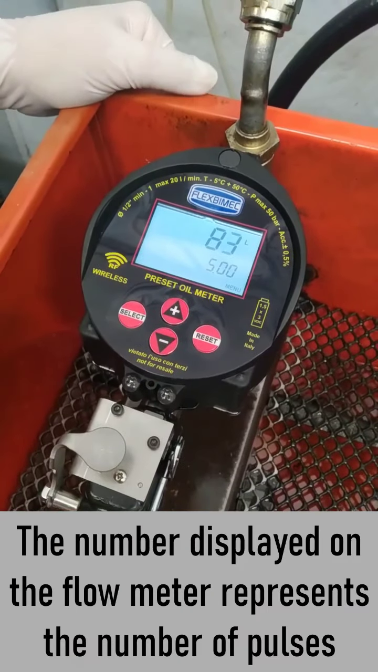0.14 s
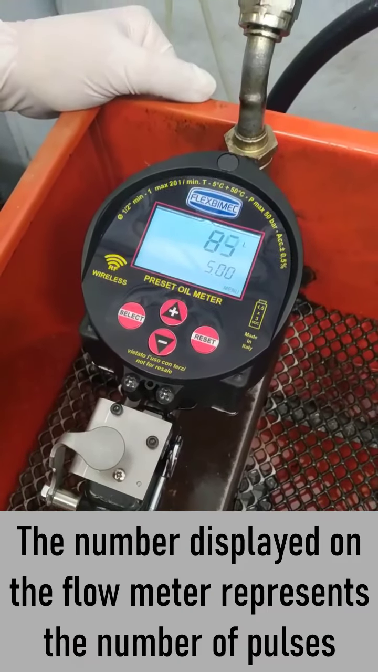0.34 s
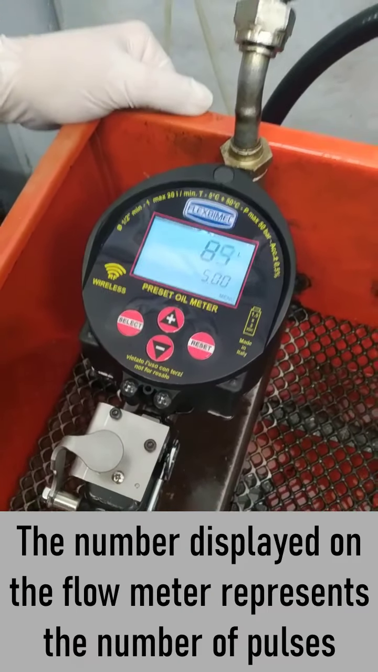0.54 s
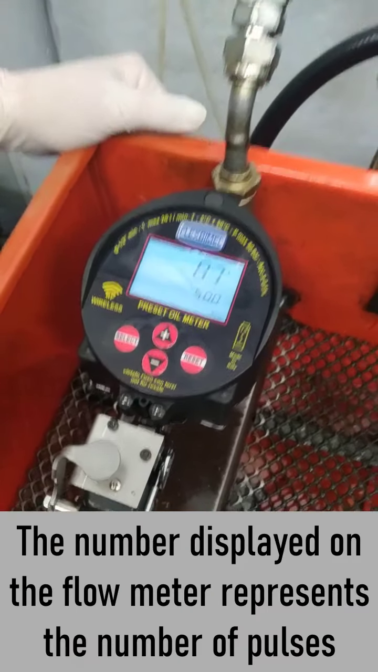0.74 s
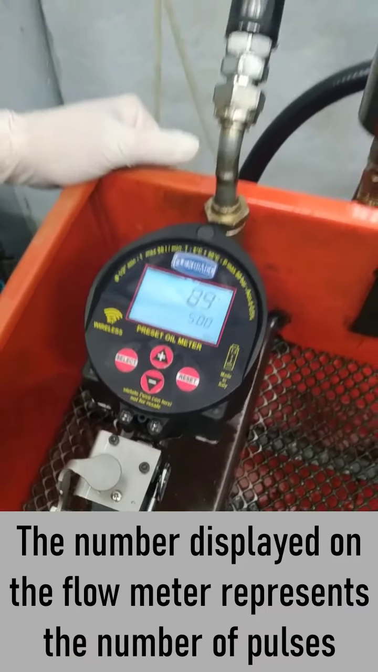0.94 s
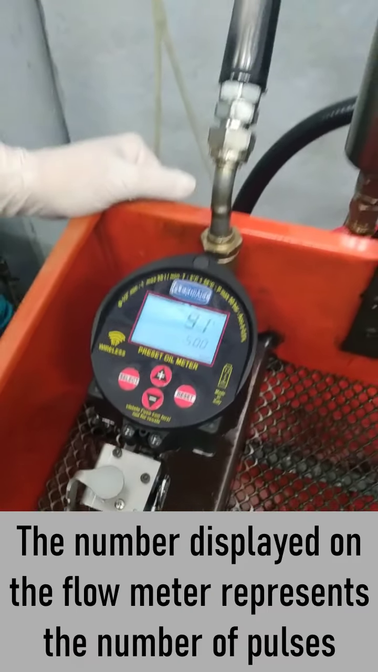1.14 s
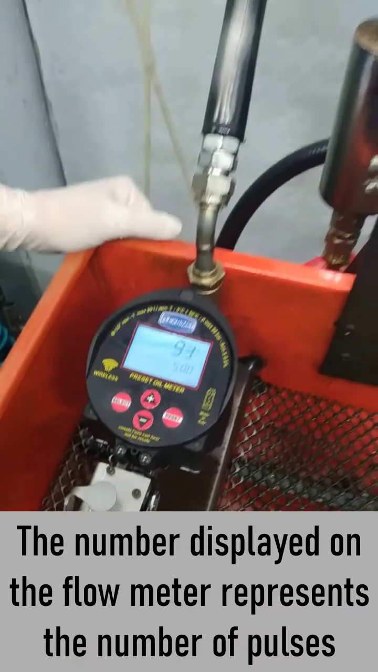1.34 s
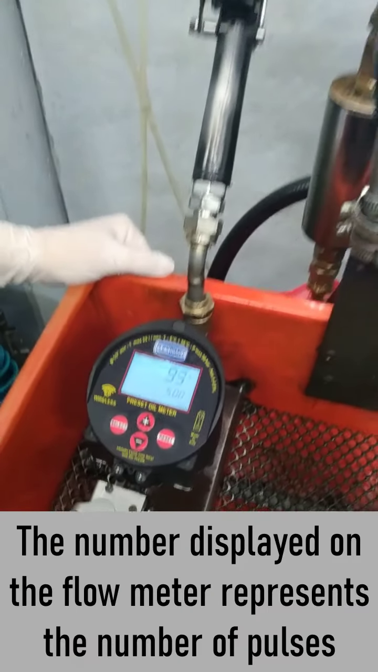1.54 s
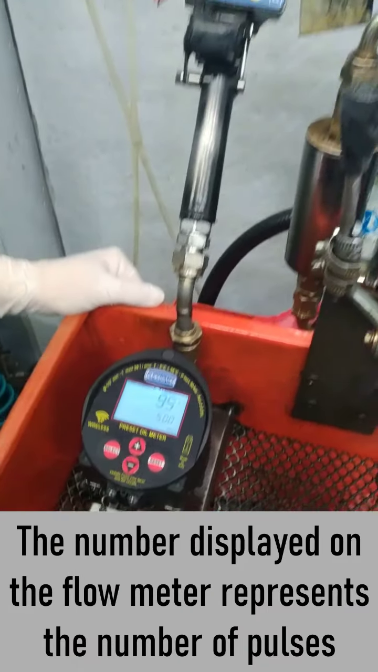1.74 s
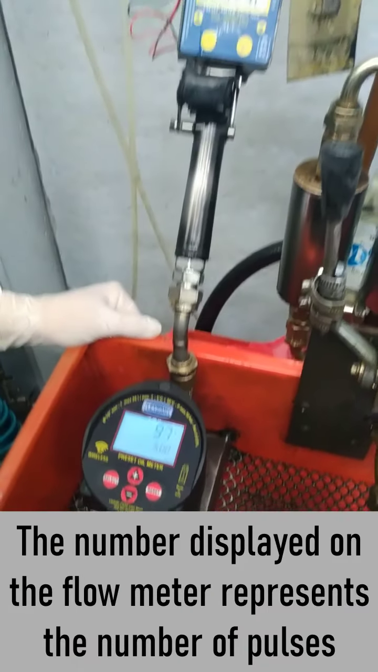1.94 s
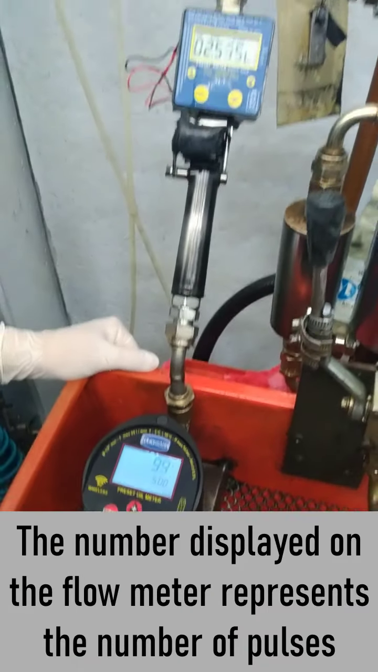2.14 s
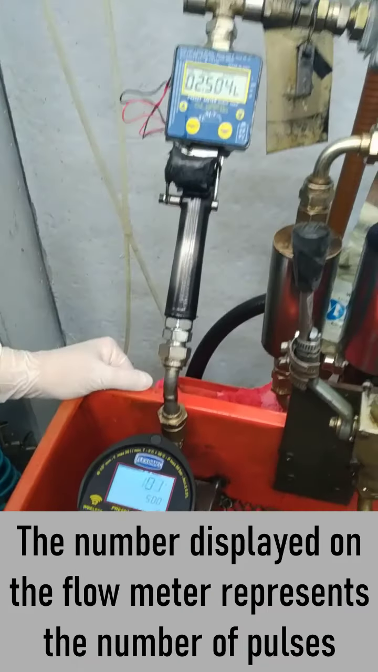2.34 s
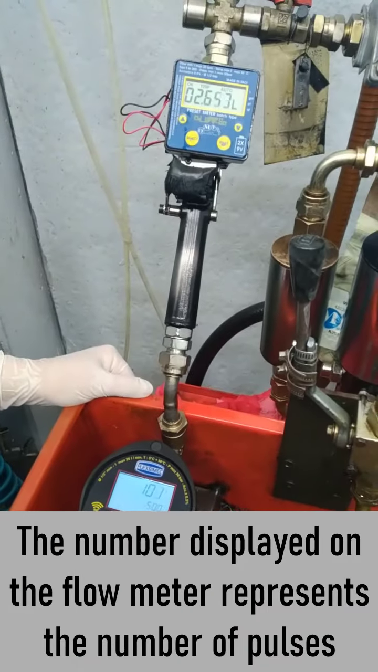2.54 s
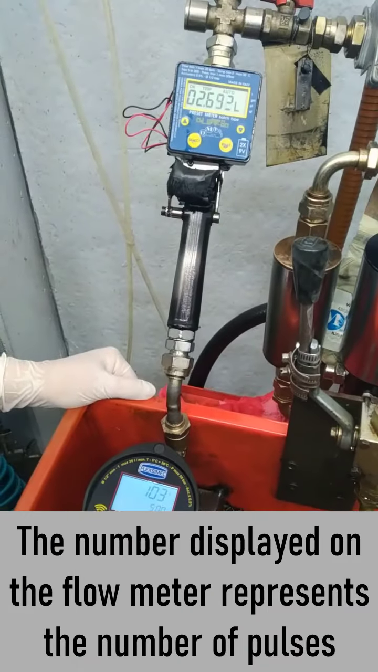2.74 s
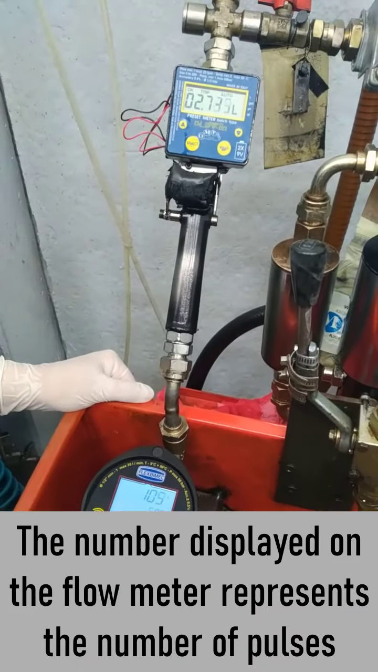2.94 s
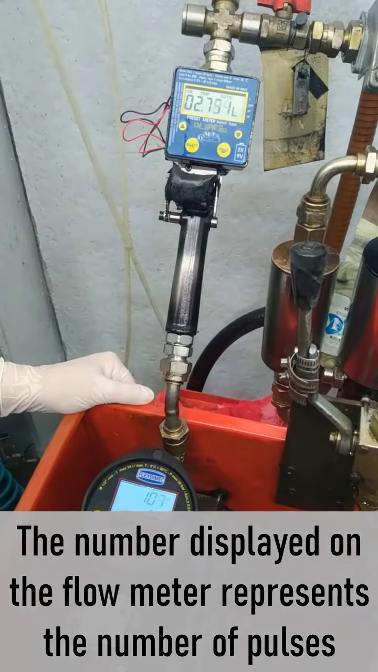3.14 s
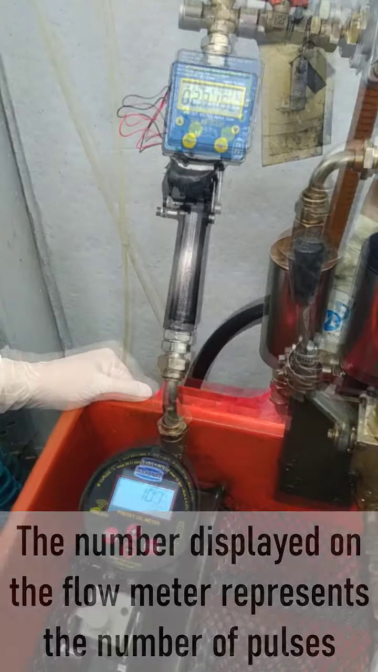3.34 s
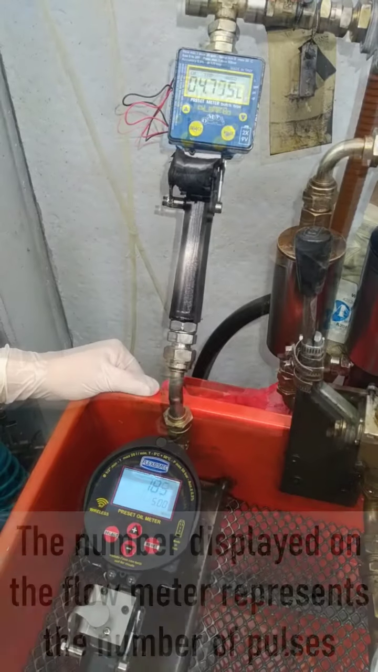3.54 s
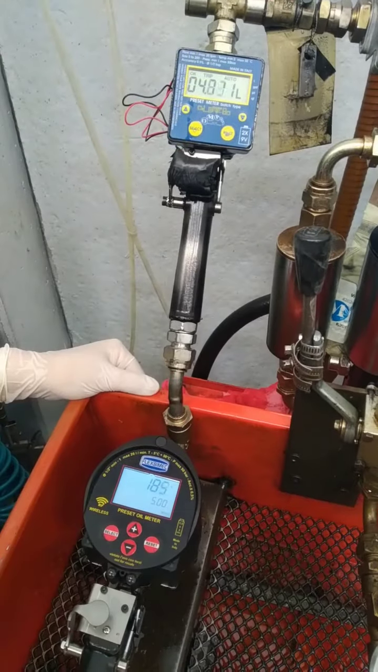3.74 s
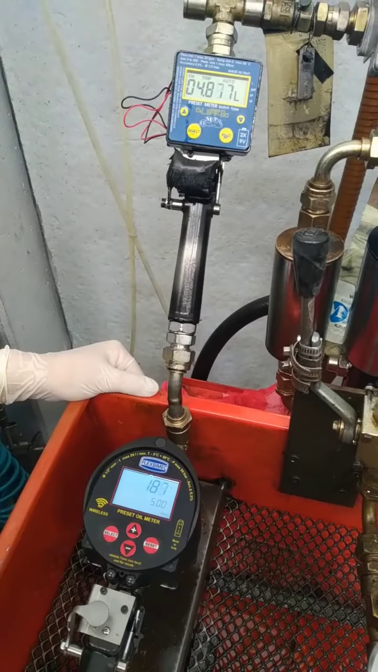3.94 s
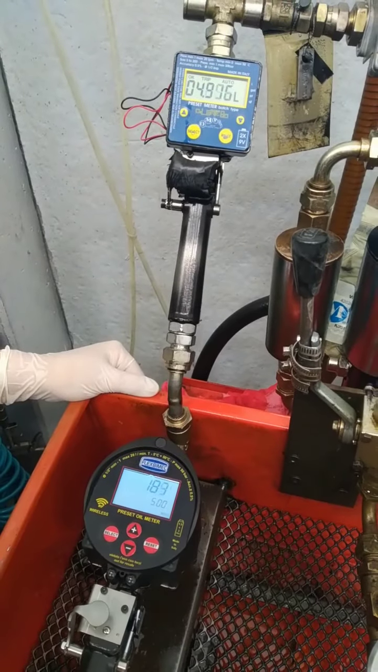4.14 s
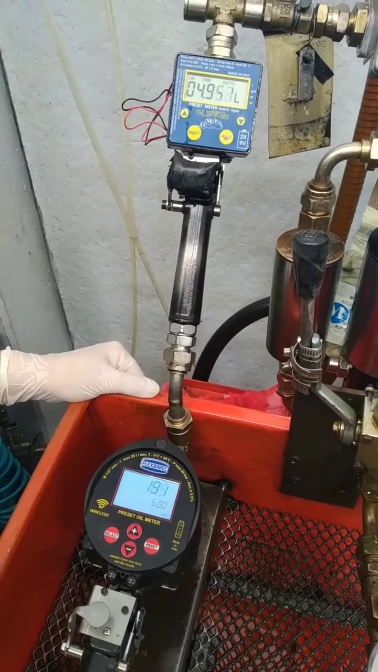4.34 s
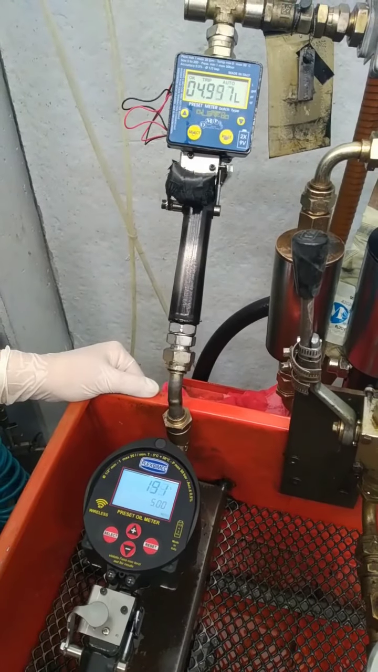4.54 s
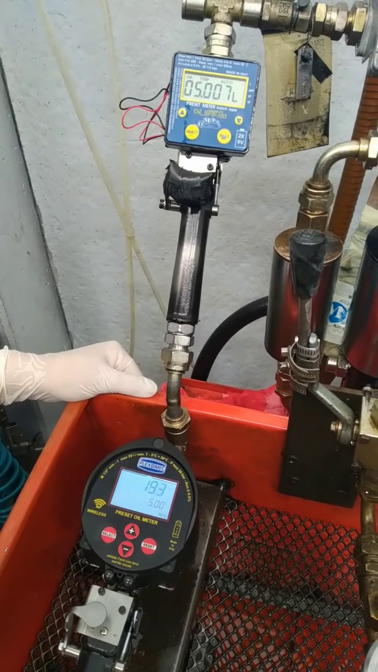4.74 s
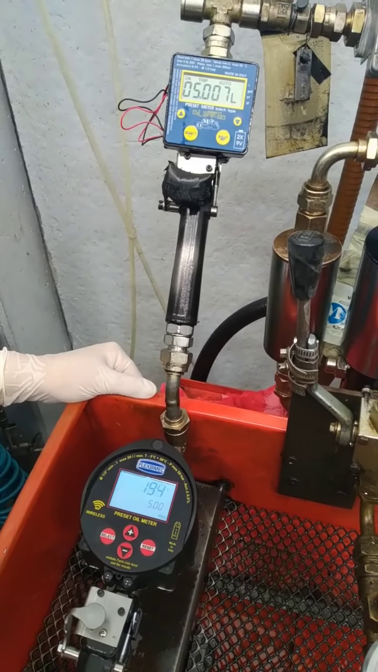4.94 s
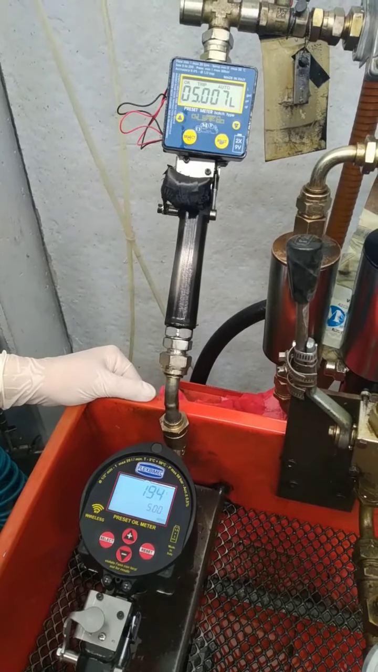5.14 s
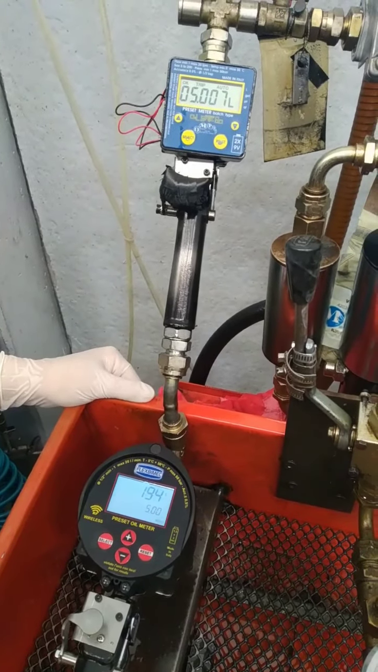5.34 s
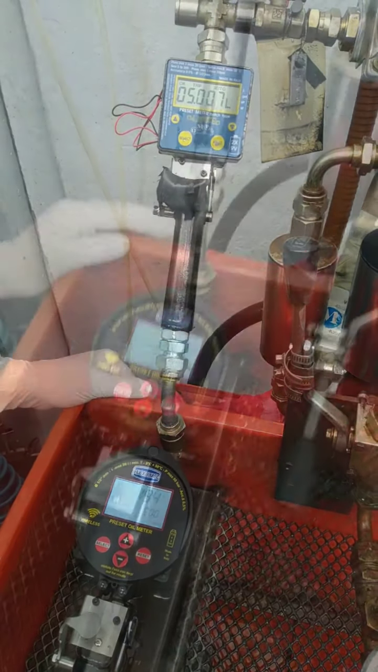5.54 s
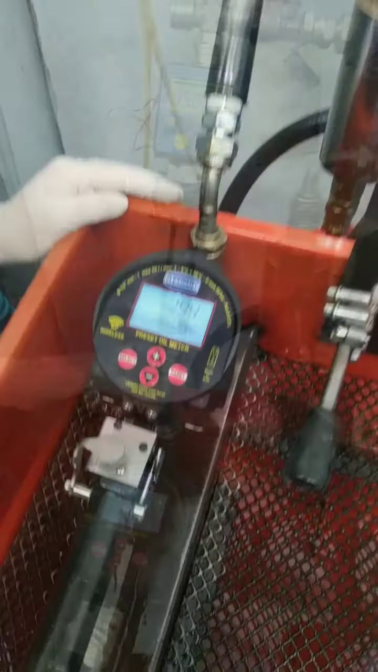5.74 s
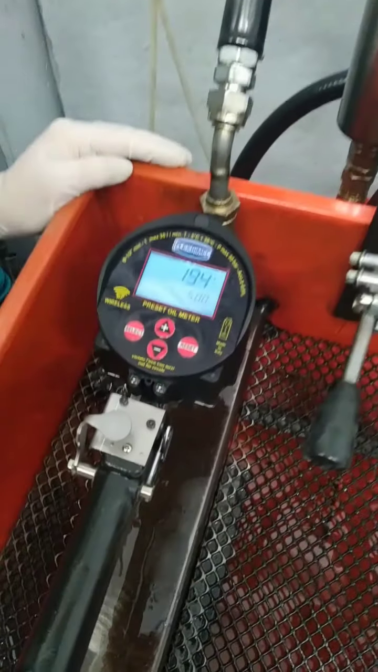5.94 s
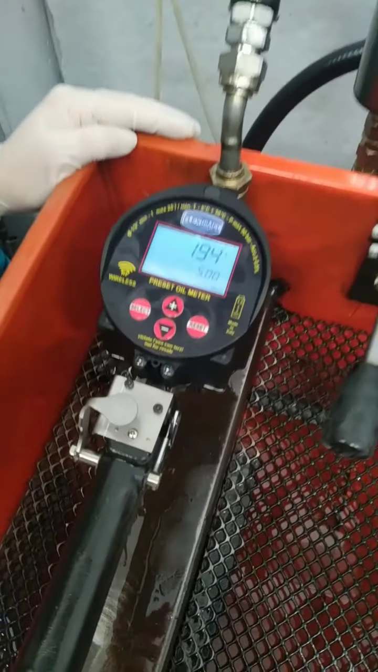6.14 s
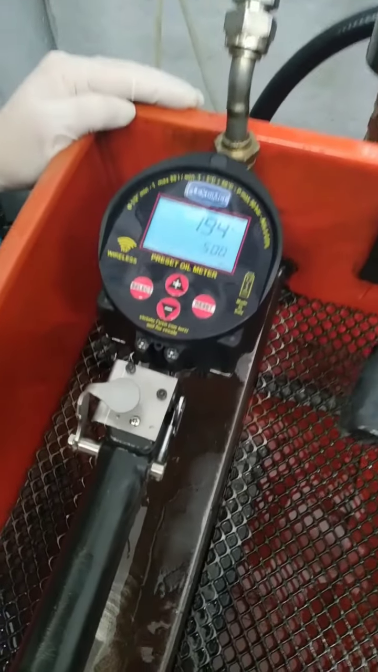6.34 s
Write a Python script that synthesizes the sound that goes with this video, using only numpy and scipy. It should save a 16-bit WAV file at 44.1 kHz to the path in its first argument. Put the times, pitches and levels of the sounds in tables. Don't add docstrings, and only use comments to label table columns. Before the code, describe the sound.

A small air-driven pump snaps rapidly and evenly over pulsing hiss and oil rush, then stalls with a hard clack and fades to faint scuffs.

```python
import sys
import numpy as np
from scipy import signal
from scipy.fft import rfft, irfft, next_fast_len
from scipy.io import wavfile
from scipy.ndimage import uniform_filter1d, minimum_filter1d, map_coordinates

SR = 44100
rng = np.random.default_rng(int(sys.argv[2]) if len(sys.argv) > 2 else 0)


def volts(x):
    e = np.asarray(x, float) / 20
    return 10 ** e


def to_wav(sig):
    pcm = np.clip(np.atleast_2d(sig), -1, 1) * 32767
    pcm = np.round(pcm).astype(np.int16)
    wavfile.write(sys.argv[1], SR, pcm.T)


N = 285751
T_S = np.arange(N) / SR


def unit(x):
    return x / np.sqrt(np.mean(x ** 2) + 1e-20)


def along(points, hz):
    f, v = np.transpose(points)
    return np.interp(np.log(hz + 1), np.log(f + 1), v)


def filtered(x, response):
    m = next_fast_len(N + SR // 2)
    return irfft(rfft(x, m) * response(np.fft.rfftfreq(m, 1 / SR)), m)[..., :N]


def colour(points):
    closed = (points[0][0] / 3, -60)
    return lambda hz: volts(along([closed] + list(points), hz))


def modes(rows):
    def one(f, centre, width, db):
        return volts(db) * 1j * f * width / (centre * centre - f * f + 1j * f * width)
    return lambda f: sum((-1) ** k * one(f, *row) for k, row in enumerate(rows))


def wander(step_count, rate_hz):
    return map_coordinates(rng.standard_normal(step_count), [T_S * rate_hz])


def noise(response, grain_db=0, rate_hz=300):
    flutter = wander(int(N * rate_hz / SR) + 4, rate_hz)
    return unit(filtered(volts(grain_db * flutter) * rng.standard_normal((2, N)), response))


def swell_db(t, rise_s, hold_s, t60_s):
    return np.where(t < 0, 9 * t / rise_s, -60 * (t - hold_s).clip(0) / t60_s)


def burst(at_s, db, rise_s, t60_s, hold_s=0):
    return volts(db + swell_db(T_S - at_s, rise_s, hold_s, t60_s).clip(-150))


def blows(times_s, dbs, late_s=.0006):
    x = np.zeros((2, N))
    x[0, (times_s * SR).astype(int)] = volts(dbs)
    x[1, ((times_s + late_s) * SR).astype(int)] = volts(dbs)
    return filtered(x, lambda hz: 1 / (1 + (hz / 9500) ** 6))


# (centre [Hz], width [Hz], level [dB])
VALVE_MODES = [(2610, 220, -12.5), (4000, 78, -17), (5310, 450, 0), (6030, 220, -16.5), (6780, 110, 2.5),
               (7140, 39, -6.5), (7300, 150, -19)]


def steel(points, ring):
    return lambda hz: colour(points)(hz) * (1 + ring * modes(VALVE_MODES)(hz))


def double_mode(hz, width_hz):
    return lambda f: modes([(hz, width_hz, 0)])(f) ** 2


# (time [s], peak level [dB], exhaust level [dB])
TOP_SNAPS = [(0.127, -9, -2), (0.5115, -7.5, -1.5), (0.8968, -7, -1.5), (1.282, -4.5, -2.5),
             (1.6666, -6.5, -1), (2.0517, -7.5, 0), (2.4343, -5, -1.5), (2.82, -5.5, -1.5),
             (3.2041, -5.5, -2), (3.5349, -10, -3), (3.919, -6, -2), (4.304, -5.5, -1.5)]
# (frequency [Hz], density [dB per Hz])
TOP_COLOUR = [(1000, -14.5), (2000, -8.5), (2800, -5), (3600, -4.5), (4300, 0), (5300, -2), (6100, -3.6),
              (6800, -0.5), (7600, -2), (8500, -12.5), (9600, -12.5), (11500, -16), (13000, -34),
              (15500, -33)]


def top_snaps():
    at_s, db, _ = np.transpose(TOP_SNAPS)
    crack = filtered(blows(at_s + .001, db + 23), double_mode(hz=5200, width_hz=1900))
    ring = lambda f: modes(VALVE_MODES[1:])(f) * colour(TOP_COLOUR)(f)
    clang = filtered(blows(at_s + 0.0027, db + 12.0), ring)
    snap = sum(burst(s + 0.002, level - 8, 0.0008, .09) for s, level, _ in TOP_SNAPS)
    onset = sum(burst(s + .001, level - 24.5, 0.0029, .02) for s, level, _ in TOP_SNAPS)
    return crack + clang + (snap + onset) * noise(steel(TOP_COLOUR, ring=1.5), grain_db=4.0, rate_hz=500)


# (time [s], peak level [dB])
BOTTOM_SNAPS = [(0.3339, -6), (0.719, -6.5), (1.103, -6), (1.489, -6), (1.873, -6.5), (2.259, -8),
                (2.6411, -7.5), (3.027, -6.5), (3.4108, -13), (3.7422, -7), (4.1265, -6), (4.5113, -7)]
# (frequency [Hz], density [dB per Hz])
BOTTOM_COLOUR = [(1000, -9), (2000, -18.5), (2800, -4), (3600, 0), (4300, 3), (5300, -4), (6100, 0),
                 (6800, -1.5), (7600, -2.5), (8500, -15.5), (9600, -16), (11500, -19.5), (13000, -24.5),
                 (15500, -24.5)]


def bottom_snaps():
    at_s, db = np.transpose(BOTTOM_SNAPS)
    tick = filtered(blows(at_s + .0005, db + 20.5), double_mode(hz=2540, width_hz=1800))
    snap = sum(burst(s + .002, level - 8.5, 0.0017, 0.065) for s, level in BOTTOM_SNAPS)
    chatter = sum(burst(s + 0.0078, level - 15.5, 0.0051, 0.099) for s, level in BOTTOM_SNAPS)
    return tick + (snap + chatter) * noise(steel(BOTTOM_COLOUR, ring=0.6), grain_db=1.5, rate_hz=450)


def cycle():
    period_s, start_s = .385, -0.068
    first = (TOP_SNAPS[0][0] - period_s, 0, 0)
    tops_s, _, exhaust_db = np.transpose([first] + list(TOP_SNAPS))
    which = (np.searchsorted(tops_s + start_s, T_S) - 1).clip(0)
    length_s = np.diff(tops_s, prepend=tops_s[0] - period_s)[which]
    return tops_s, which, T_S - tops_s[which], length_s, uniform_filter1d(exhaust_db[which], size=900)


# (time after top snap [s], rise [s], hold [s], t60 [s])
PHASES = [
    (-.022, 0.0086, 0.0085, 0.066),
    (0.018, 0.008, 0.066, 0.45),
    (0.188, 0.039, .004, 0.19),
    (0.229, 0.0097, 0.01, 0.92),
]


def driven(levels_db, since_s, release, length_s):
    power = volts(levels_db[0])
    for db, (at_s, rise_s, hold_s, t60_s) in zip(levels_db[1:], PHASES):
        for u in (since_s, since_s + length_s):
            power = power + volts(db + swell_db(u - at_s, rise_s, hold_s, release * t60_s).clip(-150))
    return 20 * np.log10(power)


# (time [s], distance [m])
DISTANCE = [(0, 0.49), (.8, 0.65), (2, 0.73), (3, 0.91), (4.5, 0.73)]


def supply():
    stall_s, air_t60_s, frame_t60_s, frame_lag_s = 4.578, .6, 1.0, .16
    at_s, metres = np.transpose(DISTANCE)
    near_db = -20 * np.log10(np.interp(T_S, at_s, metres) / metres[0])
    treble_db = -60 * (T_S - stall_s).clip(0) / air_t60_s
    bass_db = 2 + 1.08 * near_db - (60 * (T_S - stall_s - frame_lag_s) / frame_t60_s).clip(0, 17)
    return treble_db, bass_db, -14 + 4.8 * near_db


def patchy(x, depth_db):
    z = signal.stft(x, nperseg=512)[2]
    field = uniform_filter1d(rng.standard_normal(z.shape[1:]), size=5, axis=0)
    field = uniform_filter1d(field, size=7, axis=1)
    return unit(signal.istft(z * volts(depth_db * unit(field)), nperseg=512)[1][:, :N])


# (frequency [Hz], density [dB per Hz])
EXHAUST_COLOUR = [(1000, -16.5), (2000, -11.5), (2800, -3.5), (3600, 0.5), (4300, 2), (5300, -1.5),
                  (6100, 3.5), (6800, 1), (7600, 1.8), (8500, -14.5), (9600, -12.5), (11500, -16.5),
                  (13000, -21), (15500, -20.5)]
MIST_COLOUR = [(8000, -27.5), (9000, 3.5), (11000, 1.5), (13000, -4), (15500, -12.5)]
# level [dB] at rest, then in each phase
AIR_DB = (-42.5, -48, -30, -34, -35)


def exhaust():
    _, _, since_s, length_s, exhaust_db = cycle()
    treble_db, _, spray_db = supply()
    db = driven(AIR_DB, since_s, 1.1, length_s) + exhaust_db + treble_db
    jet = patchy(noise(steel(EXHAUST_COLOUR, ring=1.4), grain_db=1.0, rate_hz=110), depth_db=3.0)
    mist = noise(colour(MIST_COLOUR), grain_db=5.5, rate_hz=19)
    return volts(db - 0.5) * jet + volts(db + spray_db) * mist


# (frequency [Hz], density [dB per Hz])
OIL_COLOUR = [(500, -28), (1100, -1.5), (1700, 8.5), (2500, -4), (3200, -2.5), (4500, -33.5)]
# level [dB] at rest, then in each phase
OIL_DB = (-62, -46, -35.5, -39.5, -52)


def oil_rush():
    _, _, since_s, length_s, exhaust_db = cycle()
    db = driven(OIL_DB, since_s, 0.81, length_s) + exhaust_db + supply()[0]
    return volts(db) * patchy(noise(colour(OIL_COLOUR), grain_db=2, rate_hz=200), depth_db=3.0)


# (centre [Hz], width [Hz], level [dB])
CYLINDER_MODES = [(442.7, 31.7, 0), (495.4, 32, -2.5), (627.4, 110, -4), (788, 36, -1.5), (890, 100, -4),
                  (1195.4, 54, -6)]
FRAME_MODES = [(99, 21, 0.5), (127, 25, 1.5), (144, 31, -1.5), (230, 28, -2), (317.5, 83, -8),
               (358.2, 25, -2)]
# level [dB] at rest, then in each phase
KNOCK_DB = (-58.5, -38, -35.5, -38, -38)
THUD_DB = (-57.5, -47, -39.5, -46, -43.5)


def knock_and_thud():
    _, _, since_s, length_s, _ = cycle()
    bass_db = supply()[1]
    place = ((since_s + .1) * SR).astype(int).clip(0, 2 * SR - 1)
    habit = rng.standard_normal((2, 2 * SR))[:, place]
    shake = .75 * habit + .65 * rng.standard_normal((2, N))
    knock_db = driven(KNOCK_DB, since_s, .55, length_s)
    thud_db = driven(THUD_DB, since_s - 0.016, .7, length_s)
    knock = volts(knock_db + bass_db) * unit(filtered(shake, modes(CYLINDER_MODES)))
    return knock + volts(thud_db + bass_db) * unit(filtered(shake, modes(FRAME_MODES)))


# (frequency [Hz], level [dB])
HEAD_PARTIALS = [(436, 1.5), (488, -0.5), (795, -1), (845, -6), (633, -7.5)]


def head_boom():
    tops_s, which, since_s, _, _ = cycle()
    slam_s = .029
    surge = sum(burst(s + slam_s, -35.5, rise_s=.008, t60_s=.07, hold_s=.024) for s in tops_s)
    drum = 0
    for hz, db in HEAD_PARTIALS:
        level = volts(db + rng.normal(0, 1.4, len(tops_s))[which])
        drum = drum + level * np.cos(2 * np.pi * hz * (since_s - slam_s))
    return surge * drum * [[1], [.4]]


def bench_heave():
    sway = sum(burst(s + .1, -38.5, rise_s=0.024, t60_s=0.28) for s in cycle()[0])
    return sway * volts(supply()[1]) * noise(modes(FRAME_MODES[:3])) * [[1.4], [.15]]


# (time [s], level [dB])
CLACKS = [(3.359, -13.5), (4.576, -5), (4.749, -10.5)]
# (frequency [Hz], density [dB per Hz])
GLOVE_COLOUR = [(1500, -21), (2600, -8.5), (4300, 0.5), (6000, 1.5), (7500, -2), (8500, -11),
                (12000, -20.5), (16000, -22.5)]


def trigger():
    return filtered(blows(*np.transpose(CLACKS)), lambda hz: 4 * steel(GLOVE_COLOUR, ring=1)(hz))


# (time [s], peak level [dB], rise [s], t60 [s], low body level [dB])
SCUFFS = [(.995, -19.5, .015, 0.11, -27), (1.02, -24, 0.0043, 0.066, -13),
          (1.053, -22.5, 0.013, 0.069, -12), (3.358, -21.5, 0.0063, 0.075, -11),
          (3.385, -38, 0.0019, 0.074, -23), (3.593, -25.5, 0.0023, 0.055, -16.5),
          (4.581, -17.5, 0.0015, .09, -8.5), (4.61, -34.5, 0.011, 0.11, -3),
          (4.752, -24, 0.00041, 0.059, -10.5), (4.765, -45.5, 0.0023, .09, 0.5),
          (5.141, -44, 0.0063, .15, -9), (5.165, -51, 0.0088, 0.24, -2), (5.255, -62.5, .03, 0.3, 0.5),
          (5.434, -59.5, .006, .12, 3), (5.68, -45.5, 0.0066, 0.078, -7.5), (5.718, -50, 0.0044, .12, -9),
          (5.743, -38, 0.0057, 0.06, -8.5), (5.792, -35, 0.0065, 0.095, -9)]
# (frequency [Hz], density [dB per Hz])
BENCH_COLOUR = [(100, -23.5), (230, -7.5), (400, -0.5), (700, -5), (1100, -4.5), (1500, -5.5), (2500, -5.5),
                (4000, -32)]


def scuffs():
    rub = sum(burst(s, db, rise, t60) for s, db, rise, t60, _ in SCUFFS)
    body = sum(burst(s + 0.0026, db + low, rise, 1.2 * t60) for s, db, rise, t60, low in SCUFFS)
    glove = rub * noise(colour(GLOVE_COLOUR), grain_db=-1.0, rate_hz=150)
    return glove + body * noise(colour(BENCH_COLOUR), grain_db=3.5, rate_hz=150)


def tone(hz, drift_rad=.5):
    drift = drift_rad * wander(N // 500 + 4, SR / 500)
    return np.sin(2 * np.pi * np.cumsum(hz * np.ones(N)) / SR + drift) * [[1.4], [.6]]


# (time [s], frequency [Hz], level [dB], t60 [s])
RINGS = [(4.609, 230, -25.5, 0.078), (4.642, 233.8, -42.5, 0.26), (4.758, 1326, -45, 0.1),
         (5.16, 1515, -48, 0.2), (5.165, 1090, -48, 0.2), (5.01, 702, -58, 0.18), (5.435, 750, -59, 0.12),
         (5.62, 284, -68, 0.92), (5.745, 1743, -53, 0.085), (5.792, 681, -51, 0.11)]


def rings():
    return sum(burst(s, db, 0.071 * t60, t60) * tone(hz, drift_rad=1.3) for s, hz, db, t60 in RINGS)


def squeak():
    hz = (5610 - 13500 * (T_S - 1.42) ** 2).clip(0)
    db = (-41 - 8 * ((T_S - 1.5) / .17) ** 4).clip(-150)
    return volts(db) * tone(hz, drift_rad=.1)


def walls(x, t60_s=0.15):
    t = np.arange(SR // 2) / SR
    tail = rng.standard_normal((2, len(t))) * volts(-60 * t / t60_s) * (t > .008)
    return signal.fftconvolve(x, tail / np.linalg.norm(tail[0]), axes=1)[:, :N]


# (frequency [Hz], density [dB per Hz])
SHOP_COLOUR = [(40, -33), (87, -12), (231, -10), (500, -11), (750, -10.5), (1040, -12.5), (1810, -12),
               (3600, -14.5), (6000, -18), (8000, -28), (8400, -45.5), (16000, -61.5)]


def shop():
    fade_s, fade_db_per_s = 5.23, 19.5
    hum = noise(colour(SHOP_COLOUR), grain_db=.4, rate_hz=12)
    return volts(-58.5 - fade_db_per_s * (T_S - fade_s).clip(0)) * hum


def scene():
    pump = top_snaps() + bottom_snaps() + exhaust() + oil_rush() + knock_and_thud() + head_boom() + bench_heave()
    near = pump + trigger() + scuffs() + rings() + squeak()
    return near + volts(-19) * walls(near) + shop()


# (frequency [Hz], likeness [0-1])
ALIKE = [(100, -0.4), (170, .5), (350, 0.63), (700, 0.8), (1400, 1), (2500, 0.35), (3450, 0.64),
         (3760, 0.5), (3950, 0.4), (5000, -1.08), (6800, 2), (8500, 1.8), (13000, 1.2), (15500, -0.2)]
# (frequency [Hz], left lead [rad])
LEAD = [(60, -1), (520, 0.5), (1400, -1.5), (2300, -1.5), (3450, -2.5), (3760, -4.5), (4400, -6),
        (5500, -6.5), (6500, -5), (16000, -5.5)]
# (frequency [Hz], left minus right [dB])
LEFT = [(60, 5), (200, 9), (380, 0), (700, -1), (2400, 0), (3450, -2), (3760, -0.5), (4400, 0.5), (8100, 7),
        (15000, 7)]


def ports(pair):
    turn = lambda hz: np.arccos(np.clip(along(ALIKE, hz), 0, 1)) / 2
    shared, opposed = filtered(pair, lambda hz: np.array([np.cos(turn(hz)), np.sin(turn(hz))]))
    tilt = lambda hz: volts(along(LEFT, hz) / 2) * np.exp(.5j * along(LEAD, hz))
    both = np.array([shared + opposed, shared - opposed])
    return filtered(both, lambda hz: np.array([tilt(hz), 1 / tilt(hz)]))


def thinned(x, quiet_db=-102):
    size, sparse_hz = 1536, 8270
    hz, _, z = signal.stft(np.array([x[0] + x[1], x[0] - x[1]]) / 2, SR, nperseg=size)
    power = abs(z) ** 2
    total = power.sum(axis=(0, 1))
    calm = total < 11 * minimum_filter1d(total, size=3)
    strong = (power > 1.3 * uniform_filter1d(power, size=13, axis=1)) & (power > volts(2 * quiet_db))
    luck = rng.standard_normal((2, len(hz) // 12 + 1, len(total)))
    luck = unit(uniform_filter1d(luck, size=4))
    luck[:, sparse_hz * size // SR // 12:][:, :2] -= 1.1
    kept = strong & (np.repeat(luck, 12, axis=1)[:, :len(hz)] > -.75)
    z = z * np.where(calm & (hz > sparse_hz)[:, None], 1.42 * kept, 1)
    busy = (total > volts(-108)) & (luck[0, 0] > -1.8)
    empty = (hz > 3410) & (hz < 3920)
    z[0] *= ~(calm & busy & empty[:, None])
    mid, side = signal.istft(z, SR, nperseg=size)[1][:, :N]
    return np.array([mid + side, mid - side])


def band_limit(x):
    return signal.sosfilt(signal.butter(12, 16990, fs=SR, output="sos"), x)


def record(dry):
    ceiling, top_hz, end_s = .84, 15800, 5.836
    x = ports(dry)
    x = x / (1 + abs(x / ceiling) ** 6) ** (1 / 6)
    x = filtered(x, lambda hz: (hz < top_hz) / (1 + (85 / (hz + 1)) ** 2.4))
    rumble = noise(colour([(15, 3), (60, 1.0), (100, -23)]), grain_db=0.5, rate_hz=9)
    held = volts(-71.5 + supply()[1]) * rumble
    mix = thinned(x + held) * (T_S < end_s)
    return band_limit(mix)


dry = scene()
out = record(dry)
to_wav(out)
```